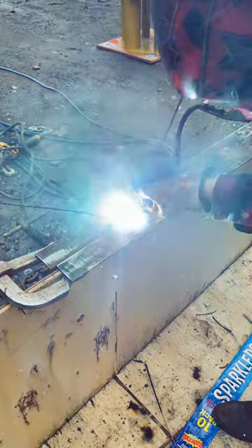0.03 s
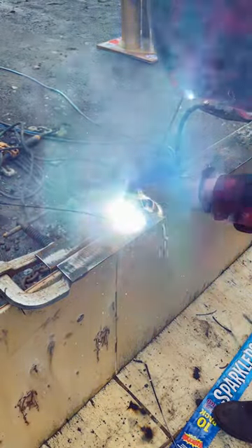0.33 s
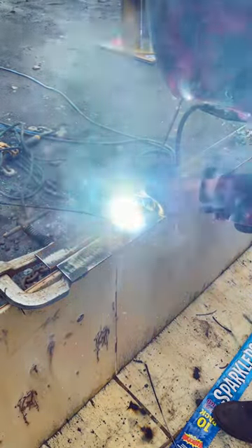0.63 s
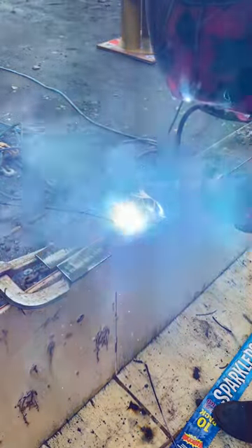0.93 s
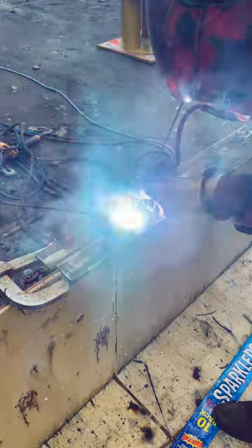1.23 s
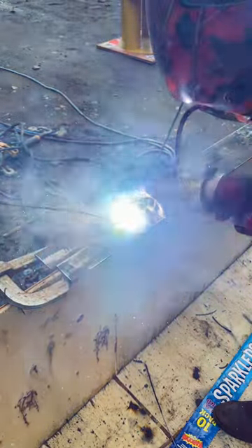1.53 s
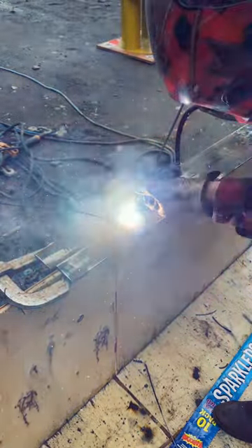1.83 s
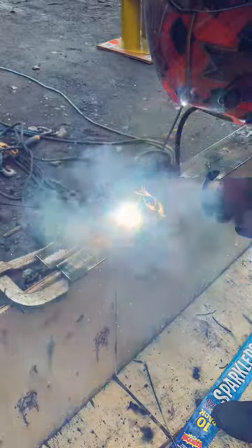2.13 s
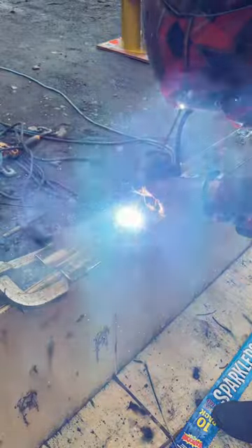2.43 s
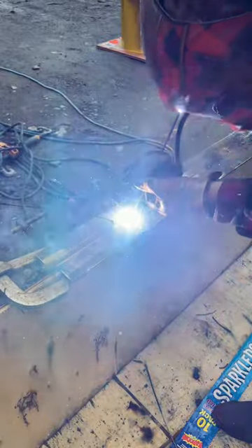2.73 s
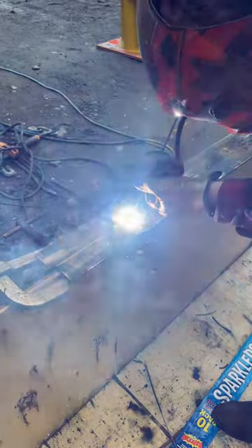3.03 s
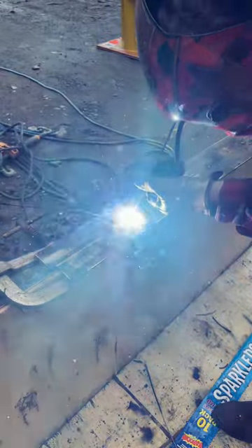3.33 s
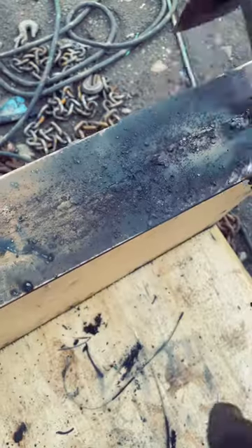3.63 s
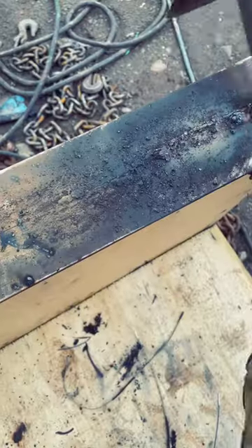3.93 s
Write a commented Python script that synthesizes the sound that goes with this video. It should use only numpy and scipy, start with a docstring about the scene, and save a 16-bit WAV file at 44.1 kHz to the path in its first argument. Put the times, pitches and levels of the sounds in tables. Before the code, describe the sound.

A welding arc hisses, crackles and spits close by outdoors, over the drone of an engine generator. The arc stops abruptly, the generator runs on more quietly, and a hammer taps twice on a steel beam.

```python
"""Stick welding on a steel beam outdoors, heard from close by on a small two-port microphone with gain control.
From the start the arc hisses and crackles over the drone of a loaded engine generator;
droplets of molten metal spit, and a few times the steel rings squeakily. At 3.45 s the arc stops
abruptly, the generator runs on unloaded, and a chipping hammer taps the slag twice."""
import sys
import numpy as np
from scipy import signal
from scipy.fft import rfft, irfft, next_fast_len
from scipy.io import wavfile
from scipy.ndimage import uniform_filter1d

SR = 44100
rng = np.random.default_rng(int(sys.argv[2]) if len(sys.argv) > 2 else 0)


def waveform_to_disk(signal):
    """Save audio, clipped to [-1, 1], as 16-bit WAV at the path in sys.argv[1]."""
    frames = np.transpose(np.atleast_2d(signal))
    scaled = np.clip(frames, -1, 1) * 32767
    samples = np.round(scaled).astype(np.int16)
    wavfile.write(sys.argv[1], SR, samples)


N = 176400
T = np.arange(N) / SR
ARC_END_S, ARC_FADE_S = 3.449, 0.0021


def amp(db):
    """dB to gain."""
    return 10 ** (np.asarray(db) / 20)


def unit(x):
    """Scale to rms 1."""
    return x / np.sqrt(np.mean(abs(x) ** 2) + 1e-20)


def read(points, hz):
    """Interpolate a table over log frequency."""
    f, value = np.transpose(points)
    return np.interp(np.log(hz + 1), np.log(f + 1), value)


def add(mix, start_s, sound):
    """Mix a sound in at start_s."""
    part = mix[max(round(start_s * SR), 0):][:len(sound)]
    part += sound[:len(part)]


def narrow_noise(hz, width_hz):
    """Noise in one resonance, rms 1."""
    f = np.fft.rfftfreq(N, 1 / SR)
    return unit(irfft(rfft(rng.standard_normal(N)) / (1 + ((f - hz) / width_hz * 2) ** 2), N))


def drift(hz):
    """Random motion, mostly below hz, rms 1."""
    return narrow_noise(0, 2 * hz)


def colour(x, spectrum, size=4096):
    """Minimum-phase filter of unit energy; the spectrum sets shape only."""
    log_gain = np.log(amp(read(spectrum, abs(np.fft.fftfreq(size, 1 / SR)))))
    taps = np.fft.ifft(np.exp(np.conj(signal.hilbert(log_gain)))).real[:size // 2]
    return signal.oaconvolve(x, taps / np.linalg.norm(taps))[:N]


def ports(x, angle=1, size=1024, count=5):
    """Two ports hear direct sound plus short, shifting reflections.
    A smaller angle lessens the left side's level advantage and phase lead."""
    # phase between ports at angle 1 (frequency [Hz], left lead [rad])
    port_phase = [(20, 0), (400, .05), (1200, .7), (2300, .6), (3000, 1.3), (3800, 2.1), (4600, 1),
                  (5250, 1.7), (5700, -.9), (6500, -1.1), (7100, -2.3), (7800, -2.95), (8700, -3.14),
                  (9500, -3.35), (11000, -4.5), (13000, -6.28), (16000, -6.28)]
    # balance at angle 1 (frequency [Hz], left minus right [dB])
    port_balance = [(20, -1.2), (60, -1.2), (200, 0), (600, 0), (1400, 3), (2500, 2.2), (4000, 4),
                    (5200, 7), (6500, 3), (8000, 0), (16000, 0)]
    # diffuse sound (frequency [Hz], power share [0..1])
    diffuse_share = [(20, .001), (60, .002), (250, .02), (600, .07), (1500, .1), (4000, .15), (6400, .25),
                     (7700, .02), (8700, .004), (9500, .015), (11000, .12), (13200, .005), (16000, .003)]
    shift_hz, echo_decay_s = 14.6, 0.004
    weights = np.array([drift(shift_hz) for _ in range(count)])
    weights /= np.linalg.norm(weights, axis=0)
    echoes = rng.standard_normal((count, size)) * np.exp(-T[:size] / echo_decay_s)
    scattered = sum(signal.oaconvolve(x * w, e / np.linalg.norm(e))[:N] for w, e in zip(weights, echoes))
    padded = next_fast_len(N + 2 * size)
    f = np.fft.rfftfreq(padded, 1 / SR)
    share, lead_rad = read(diffuse_share, f), read(port_phase, f)
    direct = np.sqrt(1 - share) * rfft(x, padded)
    diffuse = np.sqrt(share) * rfft(scattered, padded)
    lead_rad = np.where(lead_rad > 0, angle * lead_rad, lead_rad)
    tilt = amp(angle * read(port_balance, f) / 2)
    left = (direct + diffuse) * tilt * np.exp(1j * lead_rad)
    right = (direct - diffuse) / tilt
    return irfft(np.array([left, right]), padded)[:, :N]


def arc_gate():
    """1 while the arc burns, then 0."""
    return np.clip((ARC_END_S - T) / ARC_FADE_S, 0, 1)


def generator():
    """Engine orders on one wobbling shaft; under load, exhaust noise throbs once a turn."""
    # shaft speed (time [s], speed [turns/s])
    speed = [(0, 59.8), (3.44, 59.8), (3.5, 60.3), (4, 60.4)]
    # engine orders under load (multiple of shaft speed [1], relative level [dB])
    loaded_orders = [(0.5, -45), (1, 1.5), (1.5, -45), (2, -8), (2.5, -25.5), (3, -30), (3.5, -31),
                     (4, -6.7), (4.5, -19), (5, -20.5), (5.5, -22.5), (6, -27), (6.5, -29), (7, -33.5),
                     (7.5, -28), (8, -28), (8.5, -27), (9, -42), (9.5, -35), (10, -16.5), (10.5, -22.5),
                     (11, -28), (11.5, -32), (12, -23.5), (12.5, -23.5), (13, -40)]
    # further tones of labouring engine and frame (multiple of shaft speed [1], relative level [dB])
    rattle_orders = [(1.75, -21.5), (2.25, -29.5), (3.25, -17), (3.75, -19), (4.25, -22.5), (15, -31.5),
                     (16, -30), (16.5, -34.5), (18, -36.5), (22, -33), (22.5, -26), (23.5, -26.5),
                     (24.5, -38), (25, -37)]
    # engine orders without load (multiple of shaft speed [1], relative level [dB])
    unloaded_orders = [(1, 1.5), (2, -0.5), (3, -35), (4, -2.5), (5, -21), (6, -21.5), (7, -21.5), (8, -26),
                       (9, -27), (10, -23), (11, -25), (12, -20)]
    # exhaust and fan noise (frequency [Hz], relative density [dB])
    exhaust_spectrum = [(20, -15), (45, -10), (90, -5.5), (150, -5), (230, 1.5), (330, -4), (480, -6),
                        (700, -10), (1000, -15), (1500, -20), (3000, -20), (16000, -84)]
    # yard noise after the arc stops (frequency [Hz], relative density [dB])
    yard_spectrum = [(20, -9), (60, -3), (140, -4), (215, 1), (275, -13), (400, -21), (550, -22),
                     (900, -18), (1500, -22), (2400, -26), (3500, -24), (4800, -28), (6000, -35),
                     (8000, -33), (12500, -36), (16000, -49)]
    loaded_db, exhaust_db, unloaded_db, yard_db = -17, -24.5, -33, -35
    wobble, waver, throb, yard_flicker_db = 0.00199, 0.072, 0.21, 1.8
    shaft_hz = np.interp(T, *np.transpose(speed)) * (1 + wobble * drift(hz=5.88))
    shaft_rad = 2 * np.pi * np.cumsum(shaft_hz) / SR
    wavers = [1 + waver * drift(hz=6.5) * depth for depth in np.linspace(.3, 2, 7)]

    def drone(orders):
        """Low orders line up into a pulse; high ones scatter in phase and waver more."""
        tones = np.zeros(N)
        for order, db in orders:
            gain = amp(db) * wavers[min(int(order), len(wavers) - 1)]
            tones += gain * np.cos(order * shaft_rad + rng.normal() * order ** 2 / 16)
        return np.sqrt(2) * tones

    exhaust = unit(colour(rng.standard_normal(N) * (1 + throb * np.cos(shaft_rad)), exhaust_spectrum))
    loaded = amp(loaded_db) * drone(list(loaded_orders) + rattle_orders) + amp(exhaust_db) * exhaust
    unloaded = amp(unloaded_db) * drone(unloaded_orders)
    flickering = rng.standard_normal(N) * amp(yard_flicker_db * drift(hz=14))
    yard = amp(yard_db) * unit(colour(flickering, yard_spectrum))
    return ports(loaded * arc_gate() + (unloaded + yard) * (1 - arc_gate()))


def arc():
    """Thousands of tiny bursts a second over a fluttering sizzle: crackle, whistle and high fizz."""
    # arc strength (time [s], fizz level [dB], crackle level [dB]), before the layer gains
    strength = [(0.0, -25, -32), (0.02, -47, -28.5), (0.05, -34, -31.5), (0.08, -24.5, -30.5),
                (0.12, -28.5, -28.5), (0.55, -39.5, -30.5), (0.64, -35.5, -31.5), (0.75, -27.5, -31),
                (0.92, -27.5, -31.5), (0.97, -26, -29), (1.04, -45, -34), (1.14, -42, -33), (1.2, -40, -32),
                (1.22, -27, -33), (1.23, -30.5, -29.5), (1.5, -39, -29), (1.53, -41, -36.5),
                (1.58, -36, -29), (1.61, -42.5, -32.5), (1.97, -39, -33.5), (2.03, -33.5, -31),
                (2.17, -46, -32), (2.23, -33.5, -32.5), (2.3, -41, -31.5), (2.68, -38.5, -29),
                (2.77, -43, -32), (2.81, -35, -33), (2.89, -49, -32.5), (2.93, -35, -31.5),
                (3.09, -39, -30.5), (3.31, -39, -31.5), (3.34, -48, -38), (3.42, -32, -30),
                (3.44, -40, -33.5)]
    # whistly sizzle (time [s], level [dB]), before the layer gain
    whistle_level = [(0.03, -45), (0.08, -31), (0.14, -30.5), (0.29, -34.5), (0.4, -38), (0.5, -42),
                     (0.6, -40), (0.7, -33), (0.81, -34), (0.87, -36), (0.92, -34), (0.98, -30),
                     (1.05, -45), (1.18, -47), (1.24, -36.5), (1.34, -37), (1.45, -43), (1.85, -42),
                     (2.15, -45), (2.35, -54), (2.7, -35.5), (2.86, -46), (2.97, -35), (3.1, -39.5),
                     (3.3, -38), (3.35, -41), (3.44, -37)]
    # crackle (frequency [Hz], relative density [dB])
    crackle_spectrum = [(100, -26), (400, -0.5), (800, -1), (1100, -2.5), (1450, 0), (2000, -4.5),
                        (2500, -4.5), (3300, -4.5), (4150, -4), (4750, -9), (5300, -9.5), (5800, -14),
                        (6500, -11), (7200, -5.5), (8700, -21.5), (11000, -11.5), (16000, -27)]
    # whistly sizzle (frequency [Hz], relative density [dB])
    whistle_spectrum = [(100, -50), (3000, -22), (4100, -7), (4700, -12), (5100, -3), (5400, 0), (5750, -4),
                        (6400, -10), (7200, -5), (8000, -15), (16000, -45)]
    # fizz (frequency [Hz], relative density [dB])
    fizz_spectrum = [(100, -62), (3000, -24.5), (6500, -8), (8700, 2), (10800, -1), (12500, -0.5),
                     (14000, -3.5), (15800, -7)]
    sparks_per_s, spread_db, sizzle_db, flutter_db = 2500, 3.5, -1, 2
    arc_s, fizz_db, crackle_db = np.transpose(strength)
    whistle_s, whistle_db = np.transpose(whistle_level)
    sizes = amp(spread_db * np.minimum(rng.exponential(1, N), 4.8))
    sparks = unit(sizes * rng.choice([-1, 1], N) * (rng.random(N) < sparks_per_s / SR))
    flutter = amp(flutter_db * drift(hz=115))

    def layer(spectrum, times_s, levels_db, gain_db):
        """Shared sparks plus own sizzle, filtered, on a level curve."""
        source = flutter * (sparks + amp(sizzle_db) * rng.standard_normal(N))
        return unit(colour(source, spectrum)) * amp(gain_db + np.interp(T, times_s, levels_db))

    crackle = layer(crackle_spectrum, arc_s, crackle_db, gain_db=4.5)
    whistle = layer(whistle_spectrum, whistle_s, whistle_db, gain_db=-0.5)
    fizz = layer(fizz_spectrum, arc_s, fizz_db, gain_db=5)
    return arc_gate() * (crackle + whistle + fizz)


def spits():
    """Molten droplets burst: a bright snap, a few ms of sputter and a lower crack."""
    # droplet bursts (time [s], relative snap level [dB], relative crack level [dB])
    bursts = [(0.0687, 1.5, 1), (0.1307, 4, -9), (0.2548, 1, -3), (0.2962, 0, -1), (0.331, -5, -1),
              (0.404, -9, 0), (0.685, 0, 3), (0.7496, -11, -14), (0.7764, -1, -6), (0.7994, -1, -6),
              (0.844, -1, -1.5), (0.8955, -3, -7), (0.998, -9, -2), (1.1294, -1.5, 0.5), (1.2157, 5, 3),
              (1.386, -5, -15), (1.4423, -20, -4), (1.511, -2.5, 0.5), (1.613, -4, -7), (1.694, -5, -4),
              (1.807, -4.5, -10), (2.036, -2, -5), (2.1588, -20, 0.5), (2.262, -16, -5), (2.4067, -12, -1),
              (2.4824, -9.5, -7), (2.594, -5, -5), (2.6324, -12, 0), (2.796, 0.5, 1.5), (2.9352, 1.5, 2),
              (2.9769, -1, -8), (2.9824, -3, -0.5), (3.1453, -19, -4), (3.2075, -20, -0.5),
              (3.276, -11, -2), (3.3046, -8, 4.5)]
    # snap (frequency [Hz], relative density [dB])
    snap_spectrum = [(100, 16), (600, 4), (1500, -16), (4000, 0.5), (6300, -9), (8500, 12.5), (12500, 5.5),
                     (16000, -5)]
    # crack (frequency [Hz], relative density [dB])
    crack_spectrum = [(100, -25), (700, -8), (1500, -4), (3000, 1), (4300, -0.5), (5600, -5.5), (7200, -1),
                      (8700, -9), (16000, -27)]
    snap_gain_db, sputter_db, crack_gain_db = 2.5, -18, -16
    lag_s, sputter_decay_s, crack_decay_s = 0.0014, 0.0017, 0.0016
    snaps, cracks, t = np.zeros(N), np.zeros(N), T[:1000]
    for time_s, snap_db, crack_db in bursts:
        snap = amp(sputter_db) * rng.standard_normal(len(t)) * np.exp(-t / sputter_decay_s)
        snap[0] = 1  # impulse ahead of the sputter
        crack = rng.standard_normal(len(t)) * np.exp(-t / crack_decay_s)
        add(snaps, time_s + lag_s, amp(snap_gain_db + snap_db) * snap)
        add(cracks, time_s + lag_s, amp(crack_gain_db + crack_db) * crack)
    return colour(snaps, snap_spectrum) + colour(cracks, crack_spectrum)


def steel_squeaks():
    """Brief squeaky ringing of the steel near 4.2 kHz as droplets spit."""
    # squeaky rings (time [s], centre [Hz], level [dB])
    rings = [(0.688, 4200, -32), (0.968, 4200, -30), (1.22, 4150, -34), (2.16, 4270, -30)]
    width_hz, sigma_s = 780, 0.0063
    return sum(amp(db) * narrow_noise(hz, width_hz) * np.exp(-.5 * ((T - time_s) / sigma_s) ** 2)
               for time_s, hz, db in rings)


def hammer():
    """Each tap crushes slag for a few ms, knocks the beam and may leave the steel ringing."""
    # hammer taps (time [s], level [dB], ring offset [dB], slag offset [dB])
    taps = [(3.4614, -1.5, 1.5, -4), (3.734, -0.5, -32, 0)]
    # knock of hammer and beam (frequency [Hz], relative level [dB], t60 [s])
    knock_modes = [(180, -25, .08), (330, -33, .04), (800, -32, .04), (1035, -27, .03), (1200, -25, .02),
                   (1450, -26, .015), (1775, -8.5, .029), (2010, -17, .034), (2250, -26, .035),
                   (2450, -23, .04), (2850, -24, .035), (2970, -26, .03), (3400, -23, .026),
                   (4550, -28, .028), (5160, -31, .03), (6110, -30, .03)]
    # ring of bare steel (frequency [Hz], relative level [dB], t60 [s])
    ring_modes = [(1015, -19, .045), (1330, -20, .02), (1685, -13, .028), (2130, -23, .03),
                  (2950, -25, .026), (3130, -24, .026), (3310, -15, .07), (4240, -37.5, .42),
                  (4727, -34, .05)]
    # crushed slag (frequency [Hz], relative density [dB])
    crunch_spectrum = [(60, -14), (200, -9), (380, -14), (650, -9), (900, -7), (1150, -3), (1450, -4),
                       (1850, -4), (2600, -4), (3500, -3), (4500, -7), (5700, -13), (7000, -11),
                       (9000, -12), (12000, -15), (16000, -19)]
    crunch_db, crush_hold_s, crush_decay_s = -15, 0.0042, 0.003
    scatter_db, scatter_decay_s, contact_s = -3.5, 0.011, 0.0043
    crunch, steel, t = np.zeros(N), np.zeros(N), T[:SR // 2]
    crush = np.exp(-np.maximum(t - crush_hold_s, 0) / crush_decay_s)
    scatter = amp(scatter_db) * np.exp(-t / scatter_decay_s)
    for time_s, tap_db, ring_db, slag_db in taps:
        slag = (crush + scatter) * rng.standard_normal(len(t))
        add(crunch, time_s, amp(tap_db + slag_db + crunch_db) * slag)
        for modes, level_db in ((knock_modes, tap_db), (ring_modes, tap_db + ring_db)):
            for hz, mode_db, t60_s in modes:
                envelope = amp(level_db + mode_db - 60 * np.maximum(t - contact_s, 0) / t60_s)
                add(steel, time_s, envelope * np.sin(2 * np.pi * (hz * t + rng.random())))
    return ports(colour(crunch, crunch_spectrum) + steel, angle=0.86)


def scene():
    """Generator, weld and hammer in stereo."""
    return generator() + ports(arc() + steel_squeaks() + spits()) + hammer()


def record(dry):
    """Gain control ducks after loud peaks; then soft clipping and band limit."""
    detector_hz, threshold_db, recover_db_per_s = 700, -13.5, 17
    duck_share, smooth_s, cutoff_hz = 0.99, 0.047, 15800
    bright = signal.sosfilt(signal.butter(2, detector_hz, "high", fs=SR, output="sos"), dry)
    power_db = 10 * np.log10(abs(uniform_filter1d((bright ** 2).mean(0), 300)) + 1e-12)
    fall_db = T * recover_db_per_s
    held_db = np.maximum.accumulate(power_db + fall_db) - fall_db  # falling peak hold
    over_db = np.maximum(held_db - threshold_db, 0)
    pole = np.exp(-1 / (smooth_s * SR))
    ducked = dry / amp(duck_share * signal.lfilter([1 - pole], [1, -pole], over_db))
    rounded = ducked / (1 + ducked ** 8) ** (1 / 8)
    lowpass = signal.firwin(511, cutoff_hz, window=("kaiser", 9), fs=SR)
    return signal.oaconvolve(rounded, lowpass[None], "same")


dry = scene()
out = record(dry)
waveform_to_disk(out)
```